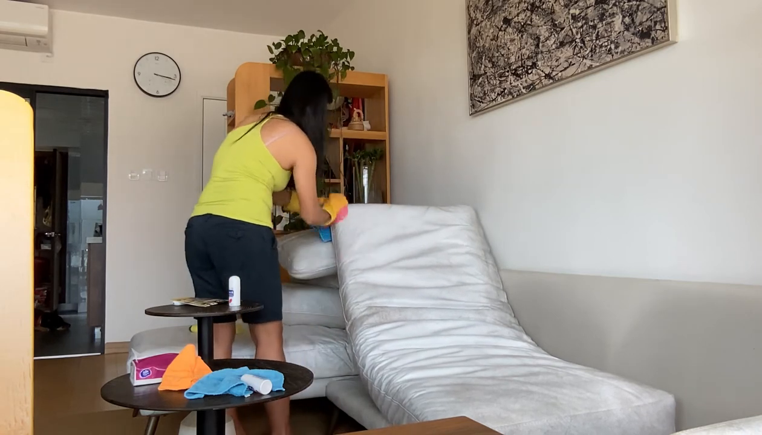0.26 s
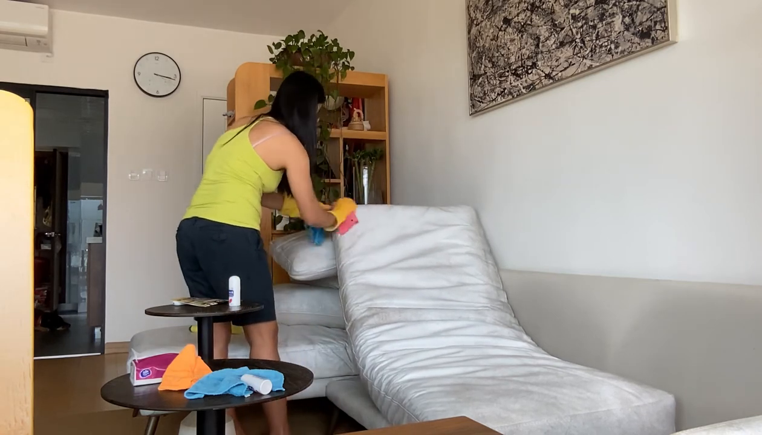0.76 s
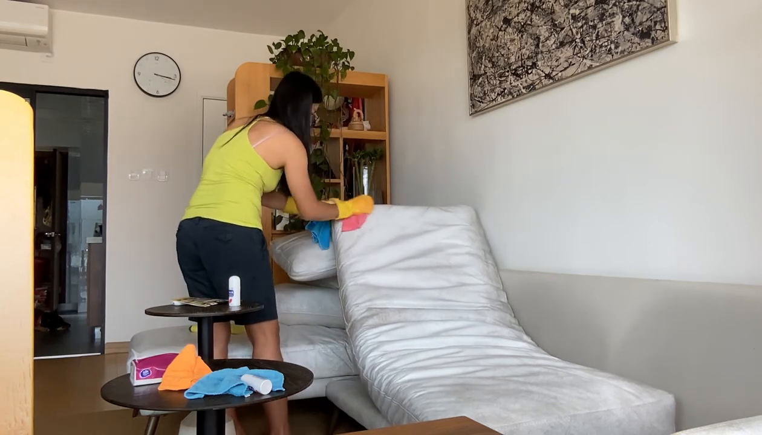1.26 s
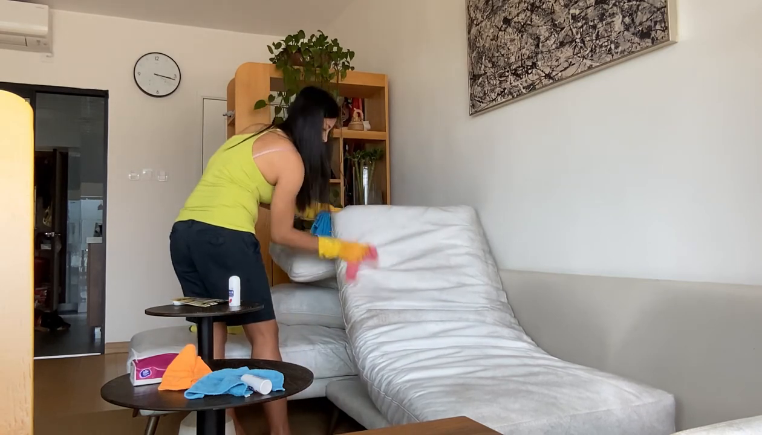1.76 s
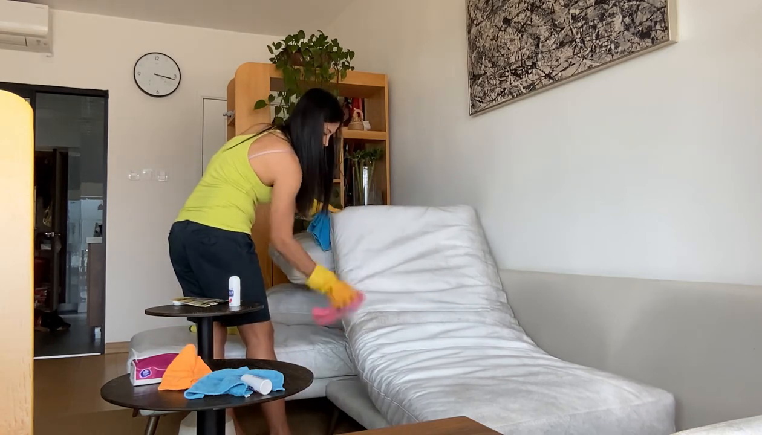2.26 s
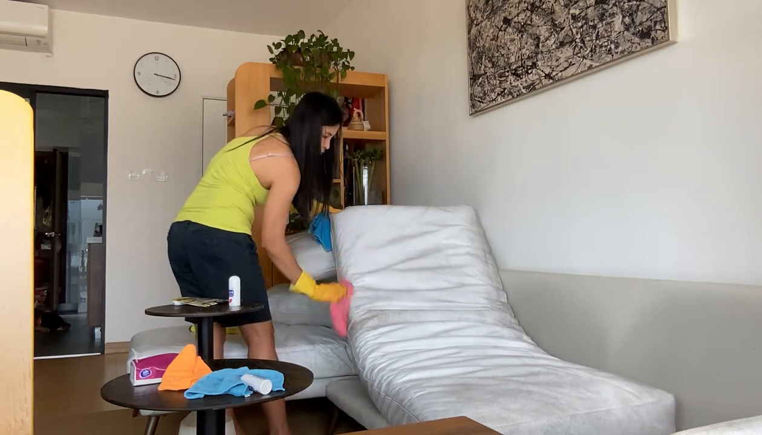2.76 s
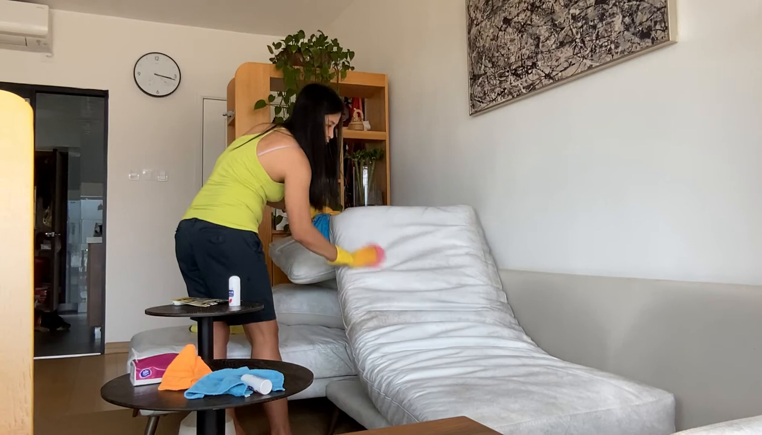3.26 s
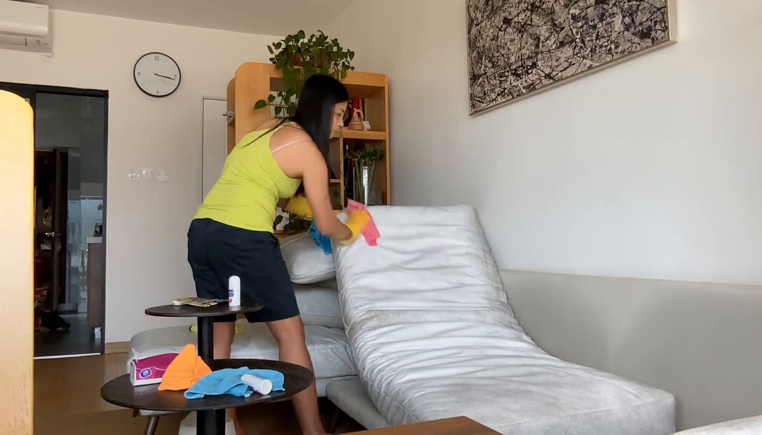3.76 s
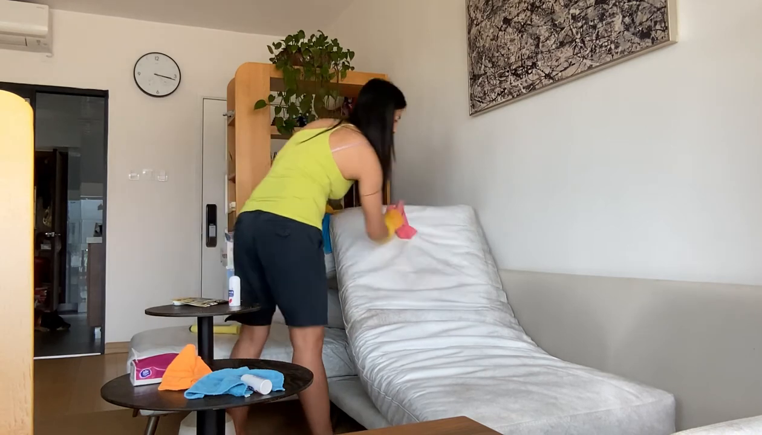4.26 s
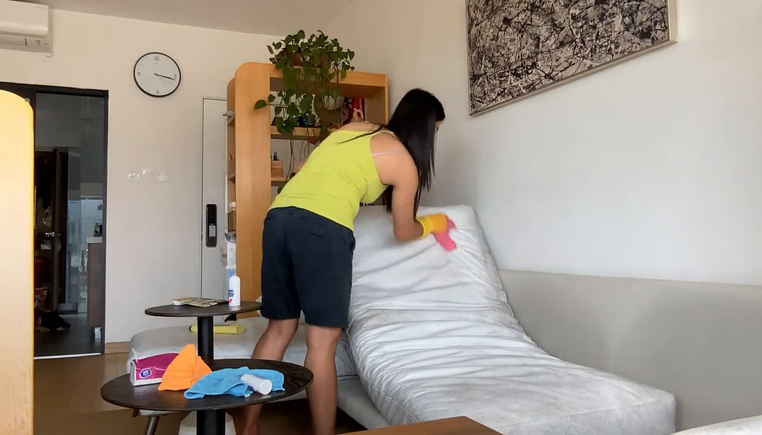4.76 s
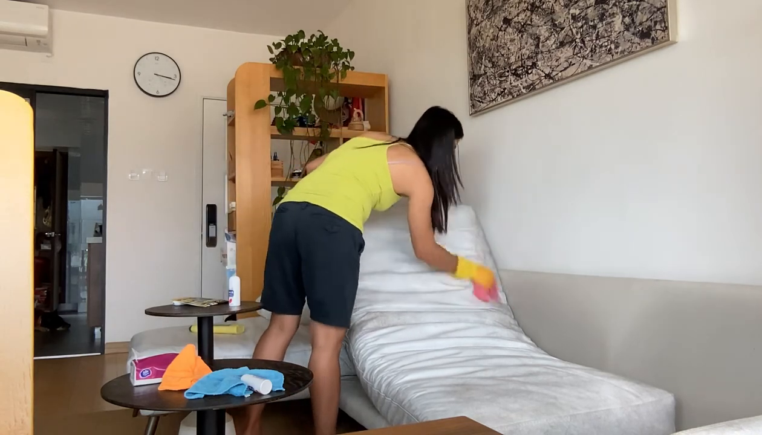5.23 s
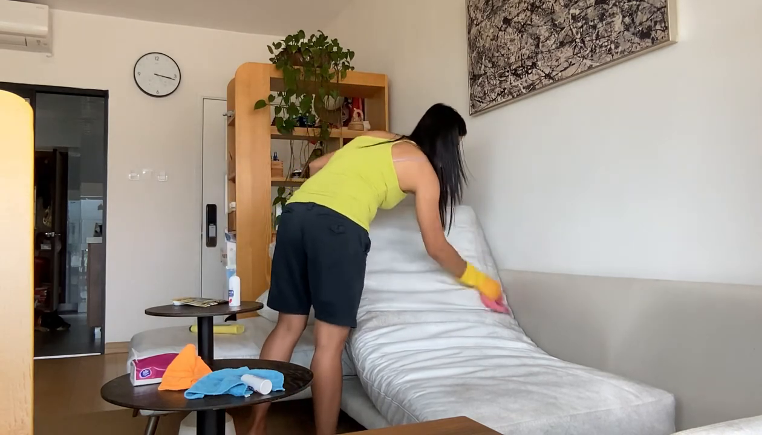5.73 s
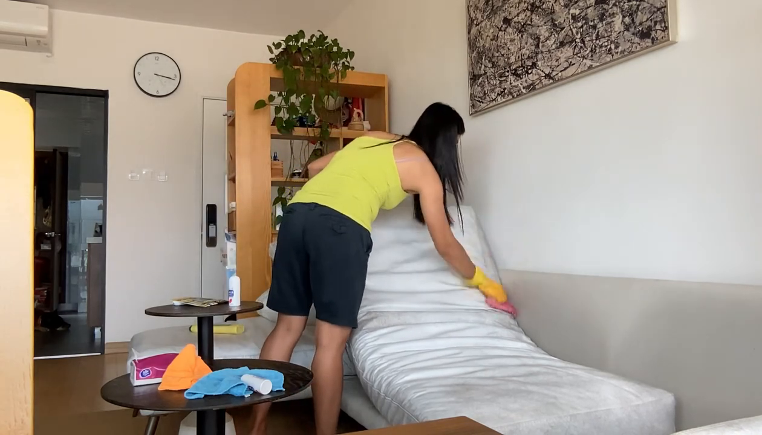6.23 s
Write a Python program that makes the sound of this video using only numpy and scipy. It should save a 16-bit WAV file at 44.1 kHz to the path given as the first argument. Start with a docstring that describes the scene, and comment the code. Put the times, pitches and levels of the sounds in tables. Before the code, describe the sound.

Rhythmic sponge scrubbing on upholstery, soft at first and then louder, with dull cushion bumps and a steady indoor hum.

```python
"""Quick back-and-forth hissing strokes over a room hum: soft at first, louder from 1.4 s.
A gloved hand wipes a padded sofa cushion with a sponge, a few metres from a phone.
The fibres hiss, the weave rasps, creases drag; creases and seams thump the cushion and its frame.
The furnished room answers briefly; the small microphone peaks in the top treble."""
import sys
import numpy as np
from scipy import signal
from scipy.fft import rfft, irfft, next_fast_len
from scipy.io import wavfile
from scipy.ndimage import uniform_filter1d, map_coordinates

SR = 44100
rng = np.random.default_rng(int(sys.argv[2]) if len(sys.argv) > 2 else 0)


def dump(signal):
    """Clip the signal to [-1, 1] and save it as 16-bit WAV at the path in sys.argv[1]."""
    limited = np.clip(np.atleast_2d(signal).T, -1, 1)
    pcm = np.round(limited * 32767).astype(np.int16)
    wavfile.write(sys.argv[1], SR, pcm)


N = 286209

# Noise spectra: f/Hz, relative density/dB
AIR_SPECTRUM = [(25, -44), (45, 3.5), (110, -5), (200, 1.5), (400, -9.5), (900, -5), (2500, -25),
                (6000, -39.5), (16000, -61)]
CIRCUIT_SPECTRUM = [(15, -3), (35, -7), (60, -9), (200, -23)]
SCUFF_SPECTRUM = [(250, -12), (500, -9), (900, 11), (1500, -19), (2600, -11), (3300, -18), (9000, -37)]
CREASE_SPECTRUM = [(400, -6.5), (650, 3.5), (900, -0.5), (1400, -0.5), (2000, -5.5), (3500, -26)]
WEAVE_SPECTRUM = [(1200, -17.5), (1900, -0.5), (2600, 1.5), (3200, -3), (4500, -6), (6500, -11.5),
                  (12000, -25)]
FIBRE_SPECTRUM = [(1500, -51), (3500, 1.5), (6000, 0), (9000, -0.5), (12500, 2), (16000, -9)]
# Resonances of the hum and the sofa parts: f/Hz, width/Hz, relative level/dB
HUM_MODES = [(68.6, 17.5, -13.5), (94.5, 9.9, -0.5), (400, 8.9, -21), (486, 13, -14), (626, 19, -30)]
PADDING_MODES = [(193.4, 14.4, -20), (220, 22, -29)]
FRAME_MODES = [(71.9, 8.2, -1), (106.3, 22, 0), (133.2, 21.7, 1), (148, 15, -0.5)]
COVER_MODES = [(259, 45, 1), (311.7, 23, 5.5), (383, 62, 4), (451.5, 30, 2)]
RAIL_MODES = [(536, 44, -2), (607, 64, -8.5)]
# Room decay: f/Hz, T60/s
ROOM_DECAY = [(100, 0.29), (1000, 0.76), (12000, 0.27)]
# Sponge landings: t/s, level/dB
LANDINGS = [(0.789, -47), (2.86, -54.5), (2.921, -45.5)]
# Floor left by the resting hand: level/dB of rasp, drag, padding, frame, cover, rail
REST_DB = (-66, -62.5, -69.5, -60, -63, -74.5)
# Strokes, each lasting until the next: start t/s, hiss at the turn/dB re HISS_REF_DB,
# speed peak/0-1, speed exponent, hiss/dB re HISS_REF_DB, pressure peak/0-1, pressure exponent,
# rasp/dB, drag/dB, thump delay/s, thump hold/s, padding/dB, frame/dB, cover/dB, top rail/dB
STROKE_TABLE = [(-0.1, -60.0, 0.6, 3.0, -54, 0.8, 0.7, -61.5, -63, 0.09, 0.097, -74, -70, -56.5, -63),
                (0.07, -57.5, 0.1, 0.97, -51, 0.35, 0.79, -62, -57, 0.016, 0.046, -54, -72.0, -55, -63.5),
                (0.3, -58, 0.7, 0.8, -50, 0.63, 0.59, -56, -60, 0.06, 0.044, -73, -72.0, -62, -70),
                (0.54, -58, 0.1, 0.54, -52, 0.3, 2.2, -56, -65, 0.06, 0.0, -74, -61, -58, -66.5),
                (0.75, -59, 0.35, 1.7, -56, 0.28, 2.7, -58, -60.5, 0.018, 0.018, -71.0, -56.5, -71, -71),
                (0.93, -63, 0.45, 0.8, -56.5, 0.4, 4.0, -67, -74, 0.085, 0.03, -75, -72.0, -57, -76),
                (1.06, -66.0, 0.48, 0.86, -53, 0.7, 1.0, -59.5, -65, 0.026, 0.15, -63, -56, -60, -67.5),
                (1.23, -62, 0.6, 0.6, -57.5, 0.6, 0.7, -66.0, -62, 0.044, 0.06, -69, -59, -63, -72),
                (1.38, -57.5, 0.68, 2.5, -43.5, 0.7, 2.2, -50, -50.5, 0.15, 0.055, -50, -39.5, -46, -55.5),
                (1.679, -54, 0.18, 1.1, -44.5, 0.26, 1.6, -53.5, -50, 0.036, 0.135, -47.5, -49.5, -50.0, -62),
                (1.93, -68, 0.5, 1.24, -44, 0.69, 1.9, -51, -49.5, 0.16, 0.03, -45, -45.5, -46, -52.5),
                (2.22, -55, 0.16, 0.8, -52.5, 0.4, 1, -54, -49.5, 0.046, 0.16, -49.5, -46.0, -50.5, -59),
                (2.53, -61, 0.5, 0.44, -53, 0.7, 1.3, -58, -54.5, 0.304, 0.0, -54.0, -72.0, -50.5, -57),
                (2.895, -67.0, 0.5, 0.7, -45.5, 0.23, 1.1, -53.5, -49, 0.034, 0.08, -46.5, -49, -48.5, -56.5),
                (3.145, -57, 0.31, 1.3, -43, 0.63, 1.15, -54.5, -51.5, 0.11, 0.12, -51.5, -53.5, -50.5, -55.5),
                (3.429, -56, 0.2, 0.75, -43.5, 0.4, 2, -53, -50, 0.052, 0.082, -52, -42, -48, -54),
                (3.72, -70.0, 0.51, 1.06, -44, 0.77, 1.5, -54.5, -53, 0.13, 0.027, -46.5, -45.5, -49, -51.5),
                (4.012, -51.0, 0.21, 2.0, -38.5, 0.44, 1.4, -53, -49.5, 0.093, 0.038, -42, -46, -48.5, -51),
                (4.282, -55, 0.55, 1.25, -44.5, 0.71, 1.5, -53.0, -49.5, 0.096, 0.099, -46.5, -45, -48, -59),
                (4.55, -55, 0.31, 1.1, -41.5, 0.4, 2.5, -51, -47, 0.05, 0.11, -44.5, -44.5, -49.5, -56),
                (4.866, -61.0, 0.52, 0.96, -42, 0.62, 3.5, -48, -45.5, 0.13, 0.085, -37.5, -42, -43.5, -54),
                (5.162, -56, 0.25, 0.86, -44.5, 0.52, 2.2, -50.5, -49, 0.063, 0.039, -37, -44, -41.5, -49.5),
                (5.43, -67.0, 0.42, 1.2, -42.5, 0.66, 2.7, -48.5, -45, 0.088, 0.086, -38.5, -40.5, -41.5, -45.5),
                (5.704, -53, 0.47, 1.0, -45, 0.54, 1.5, -50.5, -50.5, 0.014, 0.043, -45, -43, -40, -52),
                (5.968, -64, 0.45, 0.95, -44, 0.61, 1.8, -47.5, -46.5, 0.091, 0.1, -40, -41, -45.0, -54.5),
                (6.226, -50, 0.32, 3.2, -43.5, 0.41, 1.9, -52.5, -49.5, 0.05, 0.11, -46.5, -52, -43.5, -58)]

LAST_STROKE_END_S, HISS_REF_DB = 6.52, -10.0
CLOTH_TURN_DB, CUSHION_TURN_DB = -12, -16  # left as the hand turns, re the stroke's level
THUMP_RISE_S, THUMP_T60_S, SMALL_BUMPS_DB = 0.032, 0.34, -9.5
TIME_S = np.arange(N) / SR


def amp(db):
    """dB to gain."""
    return 10 ** (np.asarray(db) / 20)


def unit(x):
    """x at rms 1."""
    return x / np.sqrt(np.mean(x ** 2) + 1e-20)


def log_interp(points, hz):
    """(f/Hz, value) points interpolated over log frequency."""
    f, value = np.transpose(points)
    return np.interp(np.log(hz + 1), np.log(f + 1), value)


def wobble(rate_hz):
    """Smooth random curve, rate_hz knots a second."""
    knots = rng.standard_normal(int(N * rate_hz / SR) + 4)
    return map_coordinates(knots, [TIME_S * rate_hz])


def filtered(x, response):
    """x through a complex frequency response."""
    size = next_fast_len(N + SR // 2)
    return irfft(rfft(x, size) * response(np.fft.rfftfreq(size, 1 / SR)), size)[..., :N]


def bandpass(f, centre_hz, width_hz):
    """Response of one resonance, peak gain 1."""
    return 1j * f * width_hz / (centre_hz ** 2 - f * f + 1j * f * width_hz)


def resonant(x, modes):
    """x through parallel resonances of alternating sign."""
    return filtered(x, lambda f: sum((-1) ** k * amp(db) * bandpass(f, hz, width_hz)
                                     for k, (hz, width_hz, db) in enumerate(modes)))


def coloured(x, spectrum):
    """x shaped by a spectrum, rms 1."""
    return unit(filtered(x, lambda hz: amp(log_interp(spectrum, hz))))


def snags(rate_hz, spread_db):
    """Random impulses, most small, a few large; rms 1."""
    chance, size, polarity = rng.random((3, N))
    impulses = amp(-spread_db * np.log(1 - size)) * np.sign(polarity - .5)
    return unit(impulses * (chance < rate_hz / SR))


def room_tone():
    """Wavering narrow-band household hum over broad air noise."""
    hum = unit(resonant(rng.standard_normal(N + SR // 2), HUM_MODES))
    air = coloured(rng.standard_normal(N), AIR_SPECTRUM)
    return amp(-52.5 + 1.3 * wobble(3.51)) * hum + amp(-58.5 + 0.18 * wobble(0.91)) * air


def reverb(x):
    """Wall reflections: a delayed noise tail, each frequency with its own T60."""
    hz, t, noise = signal.stft(rng.standard_normal(SR // 2), SR, nperseg=256)
    decay = amp(-60 * t / log_interp(ROOM_DECAY, hz)[:, None])
    tail = signal.istft(noise * decay, SR, nperseg=256)[1]
    return signal.fftconvolve(np.pad(x, (400, 0)), tail / np.linalg.norm(tail))[:N]


def hand_motion():
    """Per sample: speed, pressure, thump, hiss gain at the turns, the stroke's seven layer gains."""
    (start_s, turn_db, speed_peak, speed_power, hiss_db, pressure_peak, pressure_power,
     rasp_db, drag_db, delay_s, hold_s, *sofa_db) = np.transpose(STROKE_TABLE)
    length_s = np.diff(np.append(start_s, LAST_STROKE_END_S))
    stroke = np.searchsorted(start_s, TIME_S, "right") - 1
    elapsed_s = TIME_S - start_s[stroke]
    progress = elapsed_s / length_s[stroke]

    def arch(peak, power):
        """0 at both turns, 1 at the peak; a higher power narrows it."""
        triangle = np.minimum(progress / peak[stroke], (1 - progress) / (1 - peak[stroke]))
        return np.sin(np.pi / 2 * triangle) ** power[stroke]

    speed, pressure = arch(speed_peak, speed_power), arch(pressure_peak, pressure_power)
    since_crease_s = elapsed_s - delay_s[stroke]
    rise = np.clip(since_crease_s / THUMP_RISE_S + 1, 0, 1)
    fall = amp(-60 * np.clip(since_crease_s - hold_s[stroke], 0, 1) / THUMP_T60_S)
    thump = np.hypot(rise * fall, amp(SMALL_BUMPS_DB) * np.sin(np.pi * progress))
    gains = uniform_filter1d(amp([hiss_db, rasp_db, drag_db, *sofa_db])[:, stroke], SR // 40, axis=1)
    return speed, pressure, thump, amp(np.interp(TIME_S, start_s, turn_db)), gains


def pressed(gain, push, turn_db, rest_db):
    """Envelope: power sum of the push, the turning hand and the resting hand."""
    return np.sqrt(gain ** 2 * (push ** 2 + amp(2 * turn_db)) + amp(2 * rest_db))


def scuffs(rise_s=0.0038, t60_s=0.077):
    """The landing sponge bites the cloth at once and fades fast."""
    bite = sum(amp(db - 60 * np.clip(TIME_S - at_s, 0, 1) / t60_s)
               * np.clip((TIME_S - at_s) / rise_s, 0, 1) for at_s, db in LANDINGS)
    return bite * coloured(snags(9000, spread_db=1.5), SCUFF_SPECTRUM)


def cushion(thump, gains):
    """Bumps under the hand ring the padding, frame, taut cover and top rail, each slightly late."""
    parts = ((PADDING_MODES, 0.0044, 600), (FRAME_MODES, 0.03, 500),
             (COVER_MODES, 0.027, 600), (RAIL_MODES, 0.016, 600))
    sound = np.zeros(N)
    for (modes, lag_s, rate_hz), gain, rest_db in zip(parts, gains, REST_DB[2:]):
        bumps = snags(rate_hz, spread_db=2.5)
        drive = np.interp(TIME_S - lag_s, TIME_S, pressed(gain, thump, CUSHION_TURN_DB, rest_db))
        sound += resonant(drive * bumps, modes) / np.std(resonant(bumps, modes))
    return sound


def uneven_cloth(x, depth_db):
    """Random patches of frequency and time come out louder or softer."""
    spectrogram = signal.stft(x, nperseg=512)[2]
    patches = uniform_filter1d(rng.standard_normal(spectrogram.shape), size=5, axis=0)
    patches = uniform_filter1d(patches, size=8, axis=1)
    return signal.istft(spectrogram * amp(depth_db * unit(patches)), nperseg=512)[1][:N]


def sponge(speed, pressure, turn_gain, gains):
    """Fibres hiss with speed; the weave rasps and creases drag with pressure. The grip flutters all."""
    hiss_gain, rasp_gain, drag_gain = gains
    grip = wobble(40)
    hiss = coloured(snags(14000, spread_db=1.0), FIBRE_SPECTRUM)
    rasp = coloured(uneven_cloth(snags(6000, spread_db=0.2), depth_db=2.1), WEAVE_SPECTRUM)
    drag = coloured(uneven_cloth(snags(3000, spread_db=2.53), depth_db=1.77), CREASE_SPECTRUM)
    return (np.hypot(hiss_gain * speed, turn_gain) * amp(HISS_REF_DB + 0.98 * grip) * hiss
            + pressed(rasp_gain, pressure, CLOTH_TURN_DB, REST_DB[0]) * amp(0.11 * grip) * rasp
            + pressed(drag_gain, pressure, CLOTH_TURN_DB, REST_DB[1]) * amp(0.33 * grip) * drag)


def scene():
    """One hand drives sponge and cushion in the humming room; mono."""
    speed, pressure, thump, turn_gain, gains = hand_motion()
    sofa = sponge(speed, pressure, turn_gain, gains[:3]) + scuffs() + cushion(thump, gains[3:])
    return (sofa + amp(-11) * reverb(sofa) + room_tone())[None]


def record(dry, port_hz=12600, low_cut_hz=55, top_hz=15750):
    """Microphone: port resonance, bass roll-off, faint low circuit noise, band limit."""
    port = lambda f: 1 + amp(13) * bandpass(f, port_hz, width_hz=2200)
    low_cut = lambda f: (f * f / (f * f - low_cut_hz ** 2 - 1.3j * f * low_cut_hz)) ** 2
    picked_up = filtered(dry, lambda f: port(f) * low_cut(f))
    circuit = amp(-84) * coloured(rng.standard_normal(N), CIRCUIT_SPECTRUM)
    return filtered(picked_up + circuit, lambda f: f < top_hz)


dry = scene()
out = record(dry)
dump(out)
```